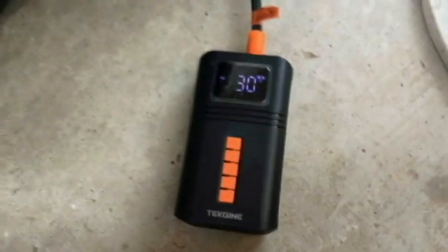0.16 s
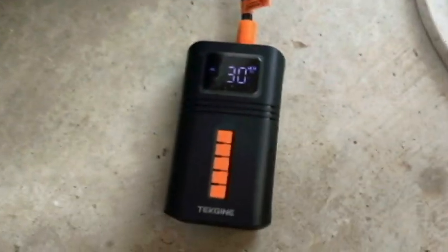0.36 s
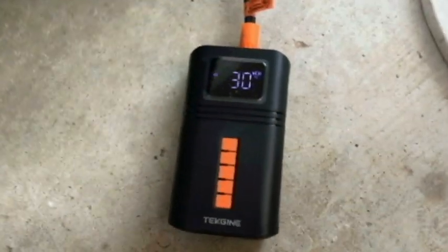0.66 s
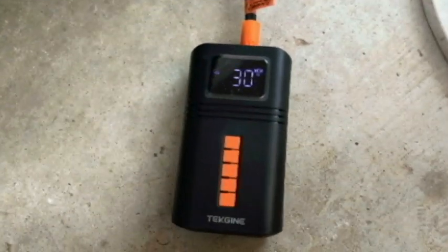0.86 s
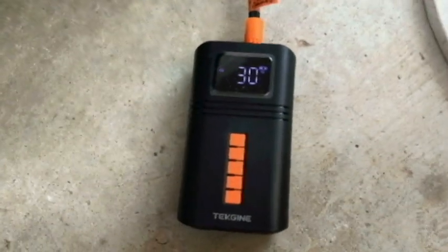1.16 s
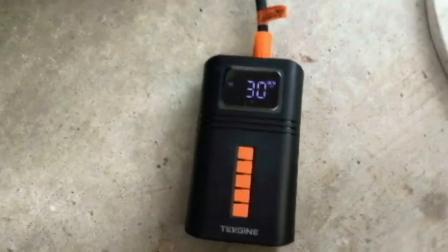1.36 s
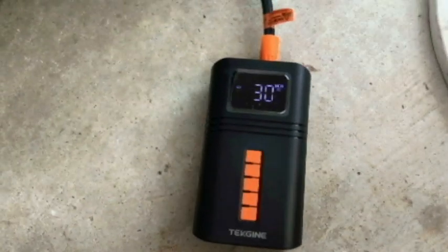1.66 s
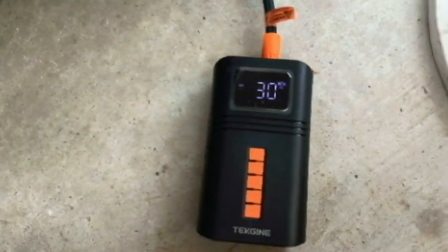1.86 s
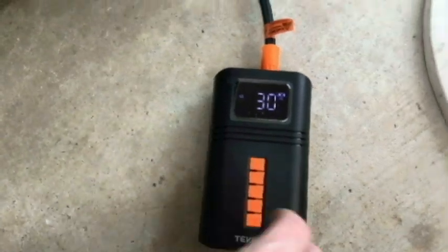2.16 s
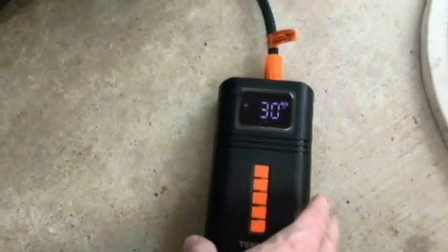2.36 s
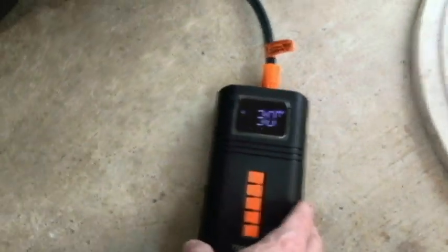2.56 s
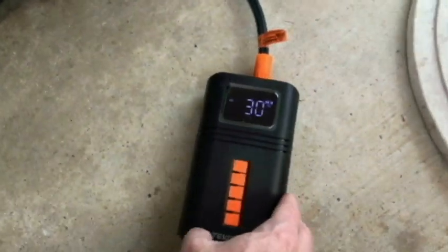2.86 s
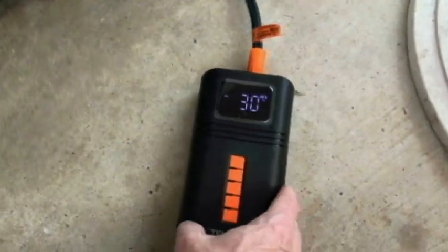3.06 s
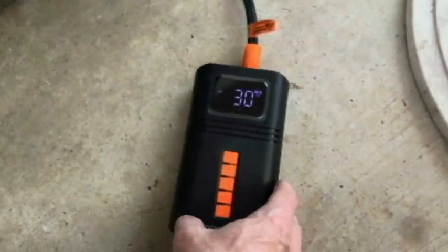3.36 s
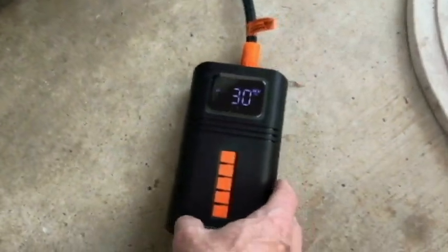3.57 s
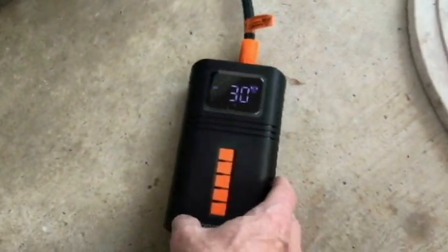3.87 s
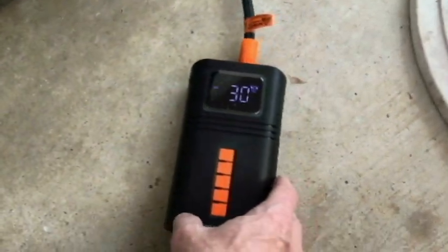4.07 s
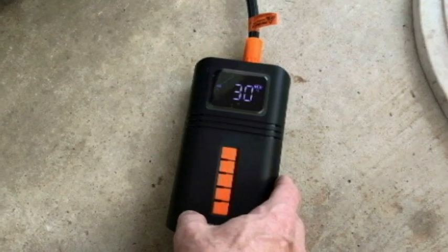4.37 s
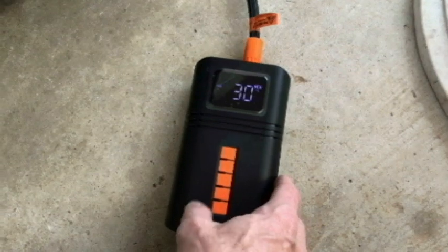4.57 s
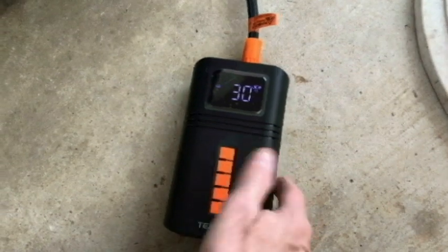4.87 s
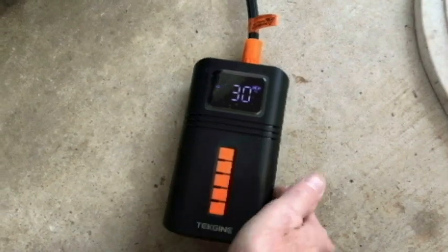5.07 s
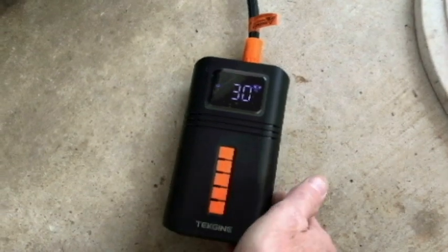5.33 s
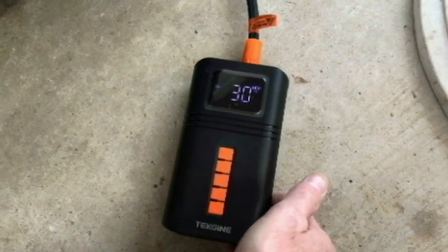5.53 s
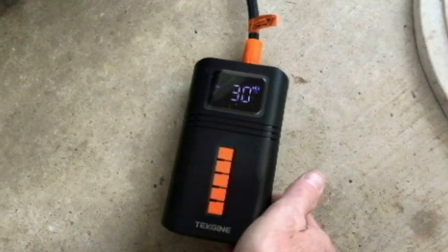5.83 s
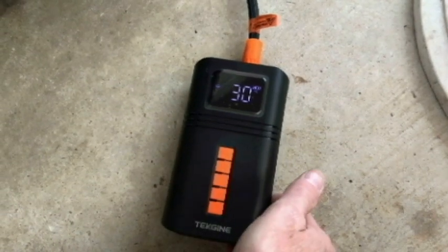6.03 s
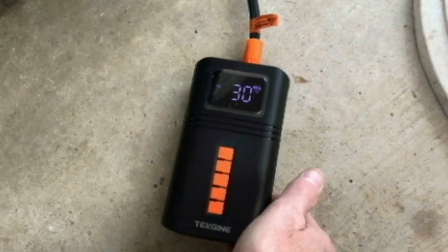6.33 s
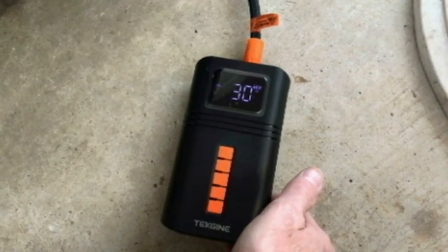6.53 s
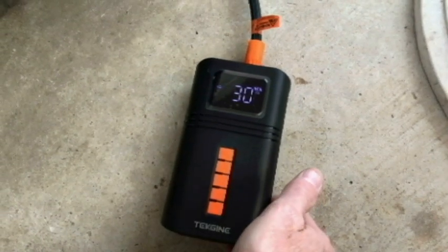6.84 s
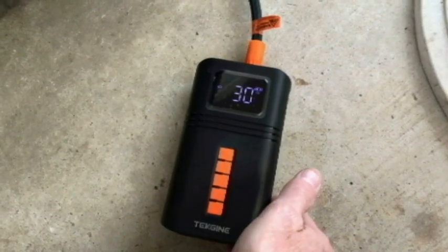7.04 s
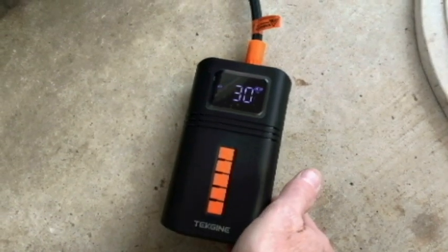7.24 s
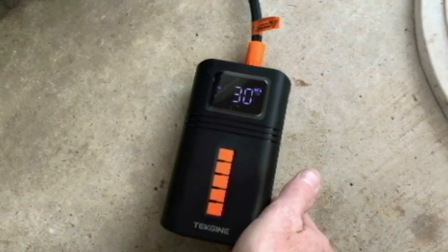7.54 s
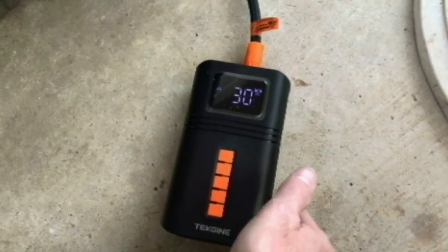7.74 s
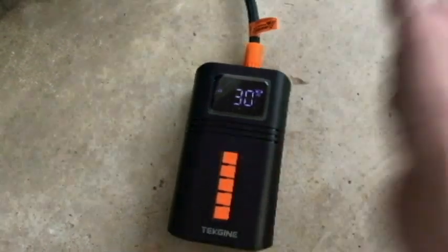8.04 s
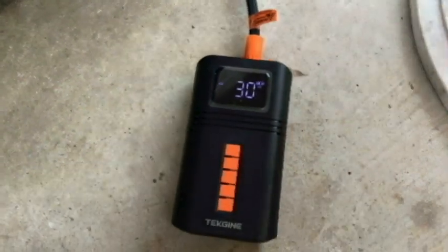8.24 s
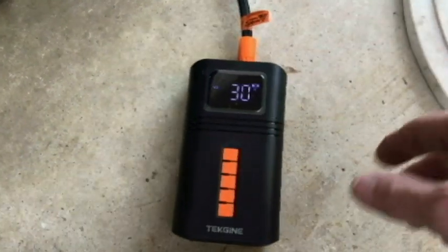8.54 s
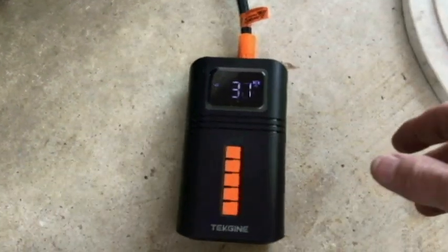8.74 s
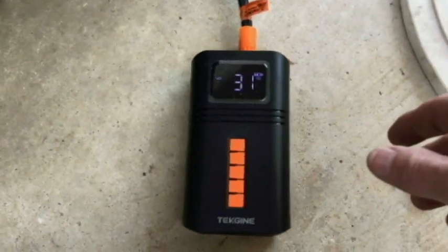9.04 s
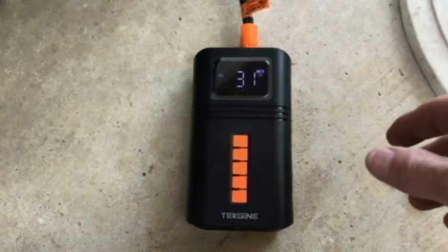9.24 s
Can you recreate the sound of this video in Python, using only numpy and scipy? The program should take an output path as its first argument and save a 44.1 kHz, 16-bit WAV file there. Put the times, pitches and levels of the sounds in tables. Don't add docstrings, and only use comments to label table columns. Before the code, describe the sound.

A compact electric tyre inflator runs without pause on a concrete garage floor, heard from just above. Its piston hammers about fifty times a second, making a low buzz, hard midrange clatter, bright metallic ringing and rough air hiss. The pitch stays almost fixed, while the upper tones shift subtly as a hand covers and uncovers the shell. The small microphone sounds loud, dense and slightly overdriven.

```python
import sys
import numpy as np
from scipy import signal
from scipy.fft import rfft, irfft
from scipy.io import wavfile

SR = 44100
rng = np.random.default_rng(int(sys.argv[2]) if len(sys.argv) > 2 else 0)


def materialize(psi):
    bounded = np.clip(np.atleast_2d(psi).T, -1, 1)
    quanta = np.round(bounded * 32767).astype(np.int16)
    wavfile.write(sys.argv[1], SR, quanta)


def nominal_scale(level):
    x = np.asarray(level, float) / 20
    return 10 ** x


N = 414540

# (time [s], speed [turns/s])
CRANK_SPEED = [(0.0, 50.432), (1.34, 50.513), (2.69, 50.422), (4.03, 50.498), (5.37, 50.367),
               (6.71, 50.229), (8.06, 50.239), (9.4, 50.128)]
# (time [s], cover [0-1])
SHELL_COVER = [(0, 0.26), (.3, 0.05), (1.2, 0.21), (2.0, .42), (2.9, 0.78), (3.5, 0.46), (5.0, 0.71),
               (5.8, 0.86), (6.2, .6), (7.6, 0.96), (8.2, 0.83), (8.5, 0.45), (9.4, 0.23)]

# (multiple of crank rate [1], level [dB])
PUSH_ORDERS = [(1, -11.5), (2, -5.5), (3, -22.5), (4, -14), (5, -18.5), (6, -26), (7, -25.5), (8, -34)]
HOUSING_ORDERS = [(9, -12.5), (10, -15.5), (11, -26), (12, -19.5), (13, -4), (14, -2), (15, 0.5),
                  (16, -6.5), (17, -2.5), (18, -4.5), (19, -1), (20, -13), (21, -7), (22, -30), (23, -18.5),
                  (24, -14), (25, -16)]
TAP_ORDERS = [(26, -12), (27, -19.5), (28, -15), (29, -18.5), (30, -27.5), (31, -18), (32, -18),
              (33, -15.5), (34, -17), (35, -29.5), (36, -17.5), (37, -29), (38, -16), (39, -15),
              (40, -17.5), (41, -16), (42, -34.5), (43, -15), (44, -26.5)]
REED_GEAR_ORDERS = [(45, -13), (46, -10.5), (47, -9.5), (48, -23.5), (49, -16.5), (50, -29), (51, -16),
                    (52, -25.5), (53, -38.5), (54, -10), (55, -37), (56, -20), (57, -19), (58, -19.5)]
CRANK_ORDERS = PUSH_ORDERS + HOUSING_ORDERS + TAP_ORDERS + REED_GEAR_ORDERS
# (multiple of crank rate [1], level change per whole unit of cover [dB],
# no change at cover 0.6)
COVERED_ORDERS = [(19, 5), (20, -7), (21, -3), (23, -8), (30, 13), (33, -4), (39, 4), (40, -7), (44, -12),
                  (46, 5), (47, 2.5), (49, 7), (56, 15)]

# (mode [Hz], friction noise width [Hz], contact angle [turns],
# ring decay [turns], level [dB], noise share [0-1])
REED_CONTACTS = [(2330, 70, .36, .15, 0, .8)]
GEAR_CONTACTS = [(3350, 60, .62, .11, 0, .15), (3410, 70, .93, .11, -1.5, .2), (3460, 80, .3, .1, -6, .25)]
UPPER_GEAR_CONTACTS = [(3680, 70, .88, .18, 0, .3)]
SMALL_PART_CONTACTS = [(4870, 74, .36, .06, -31, .3), (4750, 74, .85, .07, -33, .3),
                       (6300, 400, .53, .05, -29, .9), (8230, 90, .22, .12, -34, .7),
                       (9680, 60, .26, .1, -37, .4), (10150, 90, .47, .2, -34.5, .4),
                       (11600, 180, .26, .05, -35.5, .35), (12800, 260, .46, .05, -33, .35),
                       (12900, 200, .26, .04, -37, .3), (14400, 150, .26, .07, -40, .3),
                       (15600, 250, .3, .1, -36, .35)]
# (offset from the ring centre [Hz], friction noise width [Hz],
# contact angle [turns], ring decay [turns], level [dB], noise share [0-1])
CYLINDER_CONTACTS = [(-20, 50, .41, .2, 0, .2), (200, 80, .9, .17, -2.5, .25),
                     (-260, 140, .62, .15, -7, .5)]
VALVE_CONTACTS = [(0, 50, .37, .15, 0, .25), (130, 80, .72, .1, -8, .5), (-280, 120, .3, .1, -12, .6)]
UPPER_VALVE_CONTACTS = [(0, 160, .55, 0.14, -29.5, 0.45), (0, 160, .23, .1, -35, .5)]

# (middle [s], length [s], level change [dB], pitch change [Hz])
GEAR_SHIFTS = [
    (1.0, .7, -5.5, 0),
    (1.95, 1.2, 2.5, 0),
    (4.6, 1.2, -1.5, 0),
]
CYLINDER_SHIFTS = [
    (.45, 1.2, 10.5, -83.5),
    (1.47, 0.58, -3.5, 50),
    (2.5, 0.92, 1.5, 50),
    (4.4, 0.56, -3.5, -20),
    (6.75, 1.1, 0.1, 80),
    (8.5, .6, -3.5, 11.5),
]
VALVE_SHIFTS = [
    (.5, .8, -2, 100),
    (1.8, 1.3, 7, -250),
    (2.65, .6, -10, -250),
    (3.4, 1.5, -3, -59),
    (4.75, .6, -2, 10),
    (6.0, 1.9, 1.2, 10),
    (7.4, .8, -1, 50),
    (8.25, .8, 8, -130),
    (9.2, 1.3, -1, -170),
]

# (frequency [Hz], density [dB/Hz])
RATTLE_SPECTRUM = [(2700, -30), (3100, 2.5), (4400, 0), (4800, -9.5), (5500, -3), (8000, -2),
                   (12000, -13.5), (16000, -26)]
# (frequency [Hz], density [dB/Hz])
AIR_SPECTRUM = [(30, -15), (90, -11.5), (200, -15.5), (400, -20), (650, -9), (900, 0.5), (1300, -9),
                (2500, -12), (4000, -8), (6000, -19), (10000, -17), (16000, -20.5)]


def rms_one(x):
    return x / np.sqrt(np.mean(x ** 2) + 1e-20)


def in_time(rows):
    seconds, *columns = np.transpose(rows)
    return [np.interp(np.arange(N) / SR, seconds, column) for column in columns]


def drift(rate):
    pole = np.exp(-80 * np.pi * rate / SR)
    white = rng.standard_normal(N // 40 + 2002)
    slow = signal.lfilter([1], [1, -2 * pole, pole * pole], white)[2000:]
    return np.interp(np.arange(N) / 40, np.arange(len(slow)), rms_one(slow))


def shifts(rows):
    t = np.arange(N) / SR
    total = 0
    for middle, length, db, hz in rows:
        swell = np.cos(np.pi * np.clip((t - middle) / length, -.5, .5)) ** 2
        total = total + np.outer((db, hz), np.minimum(1, 1.4 * swell))
    return total


def crank_angle():
    start_turn, wobble = .043, .0012
    return start_turn + np.cumsum(in_time(CRANK_SPEED)[0]) / SR + wobble * drift(6.7)


def push_cycles(k, turn):
    return k * turn + .5 + .2 * (k > 4) - .35 * (k == 3)


def housing_cycles(k, turn):
    since_knock = turn - .907
    if k < 11:
        return k * (since_knock + .047)
    if k < 13:
        return k * (turn - .435) + .52
    if k < 16:
        return k * (since_knock + .062) - .345
    if k < 20:
        return k * since_knock - .5
    if k < 22:
        return k * since_knock - .13
    return k * (turn - .2) - .1


def tap_cycles(k, turn, chance):
    tap_turn, latch_turn = .0882, .68
    return k * (turn - (tap_turn if k < 35 else latch_turn)) + .75 * chance


def steady_orders(turn, cover, reed_db, gear_db):
    cover_change_db = dict(COVERED_ORDERS)
    out, scatter = 0, rng.random(len(CRANK_ORDERS))
    for (k, level_db), chance in zip(CRANK_ORDERS, scatter):
        if k < 9:
            cycles = push_cycles(k, turn)
        elif k < 26:
            cycles = housing_cycles(k, turn)
        elif k < 43:
            cycles = tap_cycles(k, turn, chance)
        elif k < 51:
            cycles = k * (turn - .52)
            level_db = level_db + reed_db + 21.5
        else:
            cycles = k * turn + chance
            level_db = level_db + 1.5 * (gear_db + 19.0)
        level_db = level_db + cover_change_db.get(k, 0) * (cover - .6)
        unsteady = np.clip(-level_db / 14, .25, 1.6)
        waver = unsteady * (1.18 * drift(0.46) + 0.4 * drift(25))
        out += nominal_scale(level_db + waver) * np.cos(2 * np.pi * cycles + 0.11 * waver)
    return np.sqrt(2) * nominal_scale(-17.5) * out


def narrow_noise(hz, width_hz):
    lowpass = signal.butter(2, width_hz, fs=SR, output="sos")
    cos_part, sin_part = signal.sosfilt(lowpass, rng.standard_normal((2, N)))
    carrier = 2 * np.pi * np.cumsum(hz + np.zeros(N)) / SR
    return rms_one(cos_part * np.cos(carrier) + sin_part * np.sin(carrier))


def contacts(turn, rows, spread_db, centre_hz=0, damping=1):
    out = 0
    for hz, width_hz, at, decay, level_db, noisy in rows:
        turn_number = np.floor(turn - at).astype(int) + 1
        draws = rng.standard_normal((int(turn.max()) + 3, 2))
        strength_db, slip = draws[turn_number].T
        since = (turn - at) % 1
        swing = (1 - np.exp(-since / .035)) * np.exp(-since * damping / decay)
        swing = swing * (1 - since ** 4)
        cycles = since * (centre_hz + hz) / CRANK_SPEED[0][1] + 0.054 * noisy * slip
        repeated = rms_one(swing * nominal_scale(spread_db * strength_db) * np.sin(2 * np.pi * cycles))
        fresh = rms_one((.55 + swing) * narrow_noise(centre_hz + hz, width_hz))
        share = np.clip(noisy, 0, 1) / damping
        out += nominal_scale(level_db) * ((1 - share) ** .5 * repeated + share ** .5 * fresh)
    return out


def reed_ring(turn, reed_db):
    return nominal_scale(reed_db - 21.0) * rms_one(contacts(turn, REED_CONTACTS, spread_db=4.0))


def gear_ring(turn, gear_db, reed_db):
    ring = nominal_scale(gear_db - 2.5) * rms_one(contacts(turn, GEAR_CONTACTS, spread_db=.9))
    upper_db = -22.0 - 3.2 * (reed_db + 26.0)
    return ring + nominal_scale(upper_db) * contacts(turn, UPPER_GEAR_CONTACTS, spread_db=2.0)


def cylinder_ring(turn, cover):
    open_hz, cover_hz = 4132, 191
    shift_db, shift_hz = shifts(CYLINDER_SHIFTS)
    centre_hz = shift_hz + open_hz + cover_hz * cover
    damping = 1 + np.clip((4170 - centre_hz) / 40, 0, 2.5)
    ring = contacts(turn, CYLINDER_CONTACTS, spread_db=.9, centre_hz=centre_hz, damping=damping)
    return nominal_scale(-22 + shift_db - 1.5) * rms_one(ring)


def valve_ring(turn):
    shift_db, shift_hz = shifts(VALVE_SHIFTS)
    centre_hz = 7074 + shift_hz
    damping = 1 + np.clip((7040 - centre_hz) / 90, 0, 2.5)
    ring = contacts(turn, VALVE_CONTACTS, spread_db=1.3, centre_hz=centre_hz, damping=damping)
    upper = contacts(turn, UPPER_VALVE_CONTACTS, spread_db=1.3, centre_hz=7560 + .6 * shift_hz)
    return nominal_scale(-23.5 + shift_db - 1.5) * rms_one(ring) + upper


def small_parts_ring(turn):
    return contacts(turn, SMALL_PART_CONTACTS, spread_db=2.5)


def coloured(x, spectrum):
    hz, level_db = np.transpose(spectrum)
    log_hz = np.log(np.arange(N // 2 + 1) * SR / N + 1)
    return rms_one(irfft(rfft(x) * nominal_scale(np.interp(log_hz, np.log(hz), level_db)), N))


def stroke_swell(turn):
    phase = (turn - 0.21) % 1
    return 1 + 0.34 * np.sin(np.pi * phase ** 0.52) ** 2


def surface_noise(turn, size=880):
    place, wear = turn % 1 * size, 1.33 * drift(0.75)
    patterns = rng.standard_normal((2, size))
    one, other = [np.interp(place, np.arange(size + 1), np.append(p, p[0])) for p in patterns]
    return np.cos(wear) * one + np.sin(wear) * other


def gear_rattle(turn):
    return nominal_scale(-21.5) * coloured(stroke_swell(turn) * surface_noise(turn), RATTLE_SPECTRUM)


def air_hiss(turn):
    flow = stroke_swell(turn) * nominal_scale(1.03 * drift(107)) * rng.standard_normal(N)
    return nominal_scale(-17.5 + 0.065 * drift(1.0)) * coloured(flow, AIR_SPECTRUM)


def scene():
    turn = crank_angle()
    cover, = in_time(SHELL_COVER)
    reed_db = -16.5 - 9 * cover
    gear_db = -23.5 + 3 * cover + shifts(GEAR_SHIFTS)[0]
    pump = steady_orders(turn, cover, reed_db, gear_db)
    pump += reed_ring(turn, reed_db)
    pump += gear_ring(turn, gear_db, reed_db)
    pump += cylinder_ring(turn, cover)
    pump += valve_ring(turn)
    pump += small_parts_ring(turn)
    pump += gear_rattle(turn) + air_hiss(turn)
    return pump[None]


def band_limit(x):
    return signal.sosfilt(signal.butter(12, 15910, fs=SR, output="sos"), x)


def record(dry):
    drive_db, knee, ceiling = 1.05, 2.8, 1.2
    loud = nominal_scale(drive_db) * dry
    squeezed = loud / (1 + np.abs(loud / ceiling) ** knee) ** (1 / knee)
    lowpass = signal.cheby2(22, 60, 15990, fs=SR, output="sos")
    return band_limit(signal.sosfilt(lowpass, squeezed))


dry = scene()
out = record(dry)
materialize(out)
```